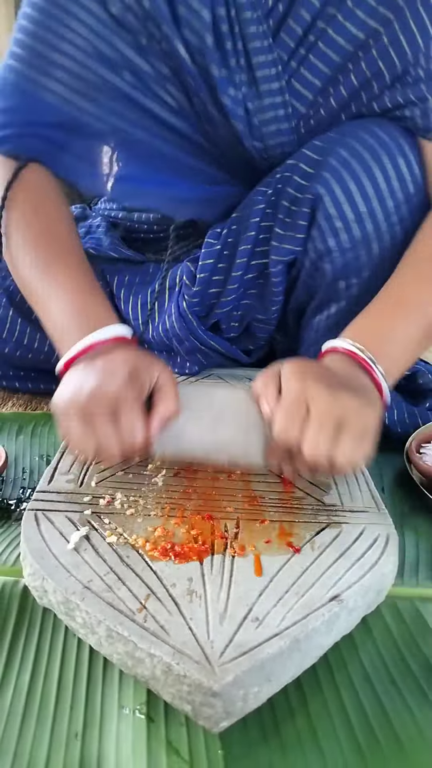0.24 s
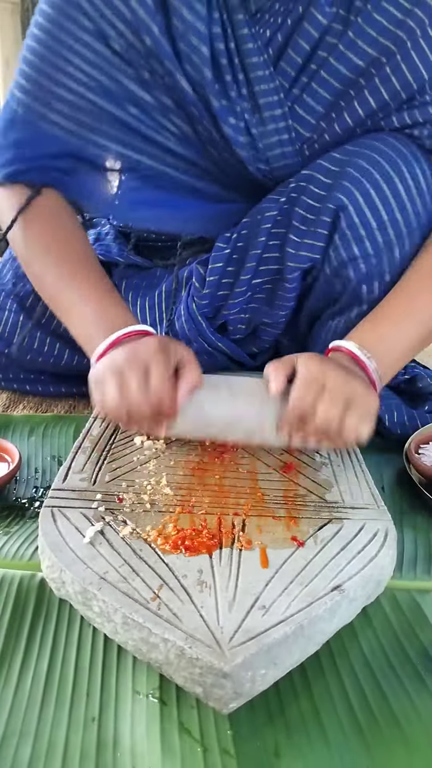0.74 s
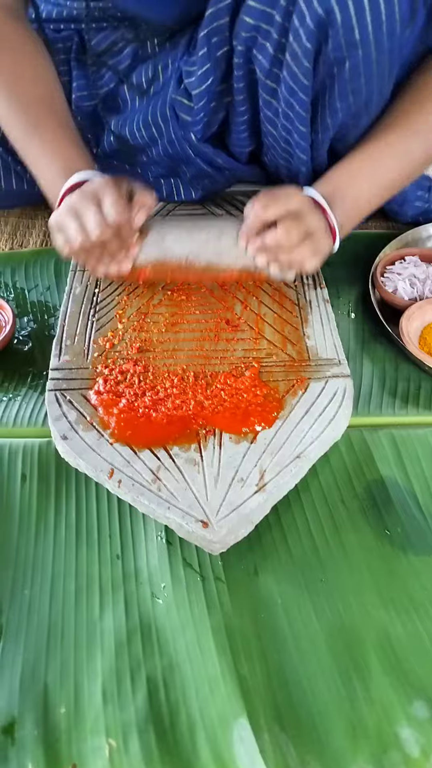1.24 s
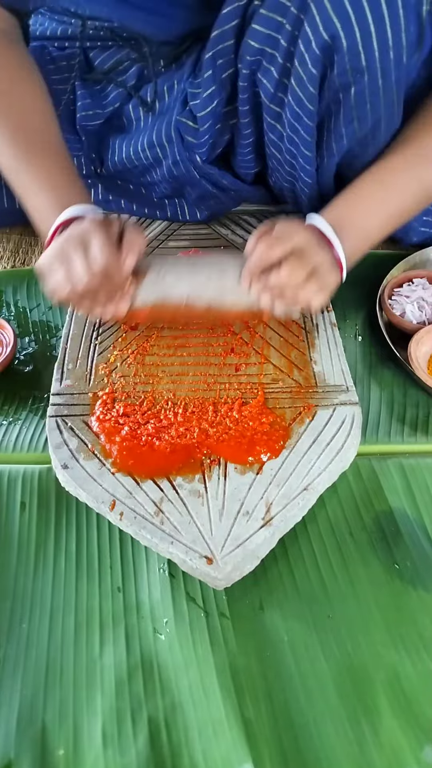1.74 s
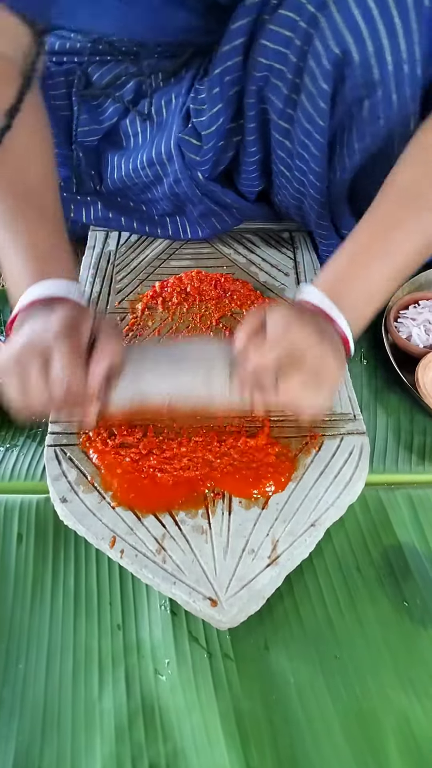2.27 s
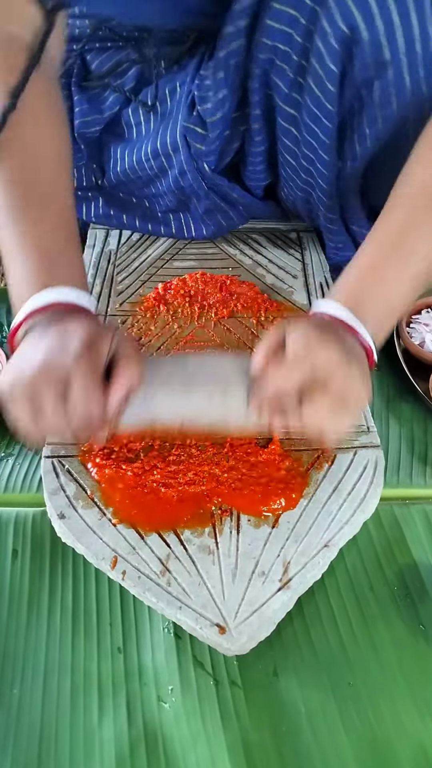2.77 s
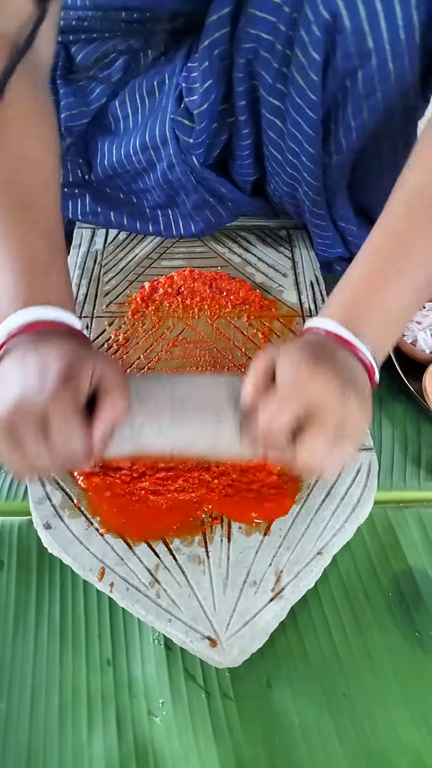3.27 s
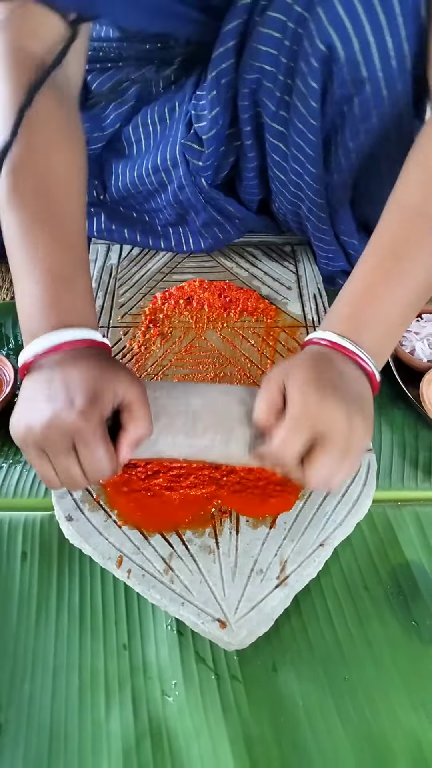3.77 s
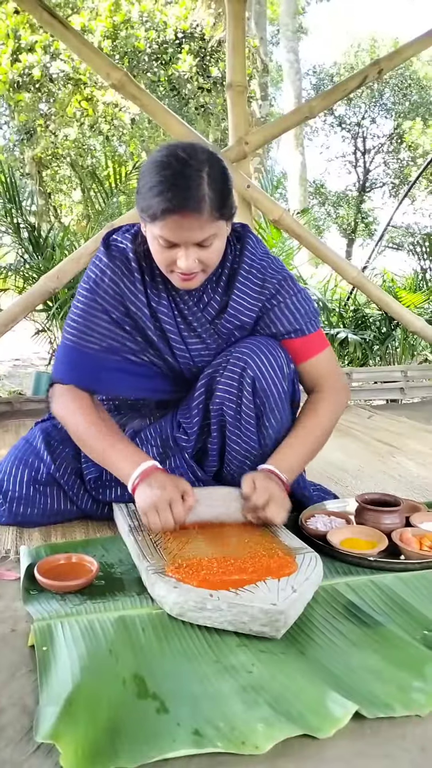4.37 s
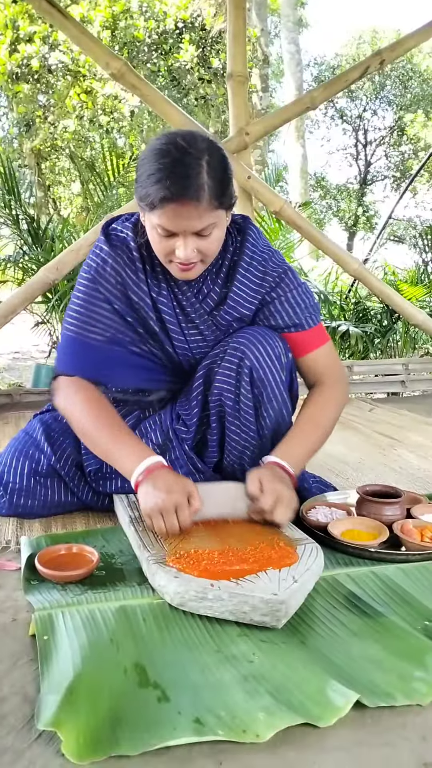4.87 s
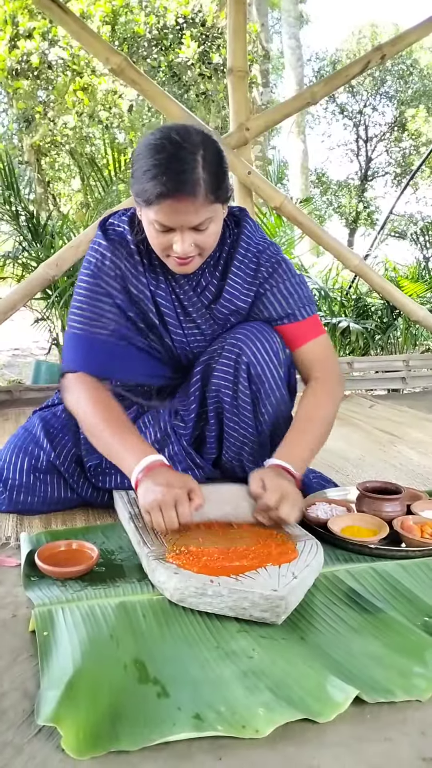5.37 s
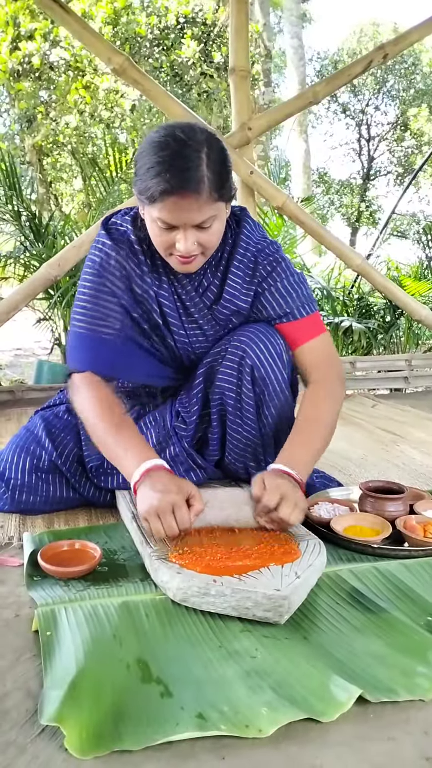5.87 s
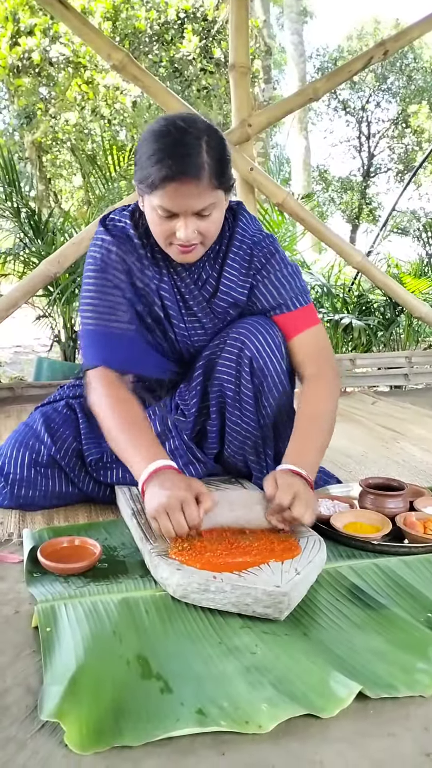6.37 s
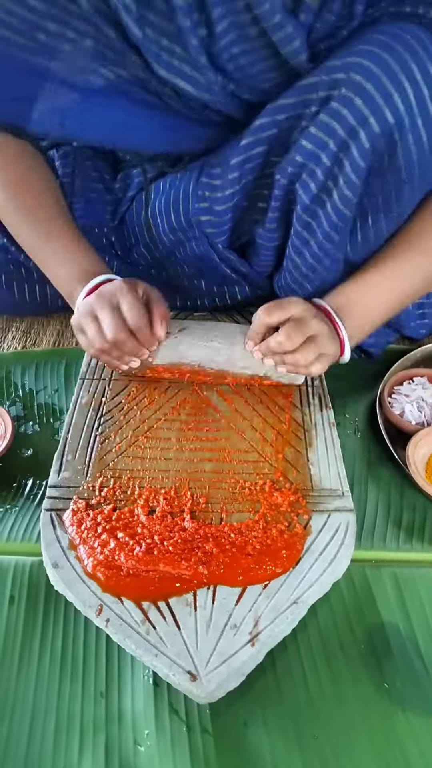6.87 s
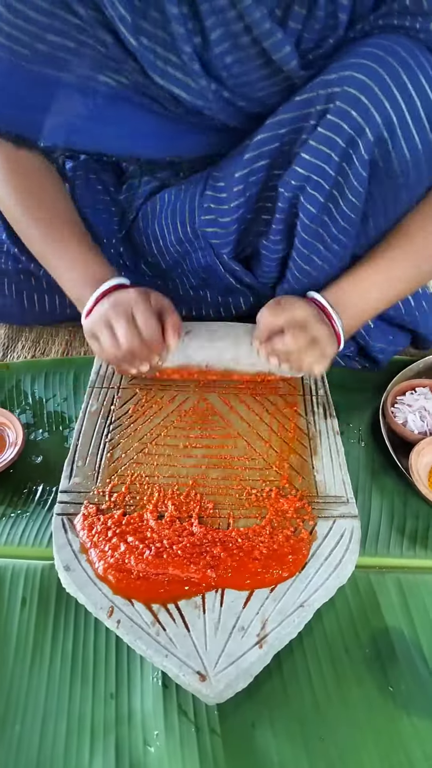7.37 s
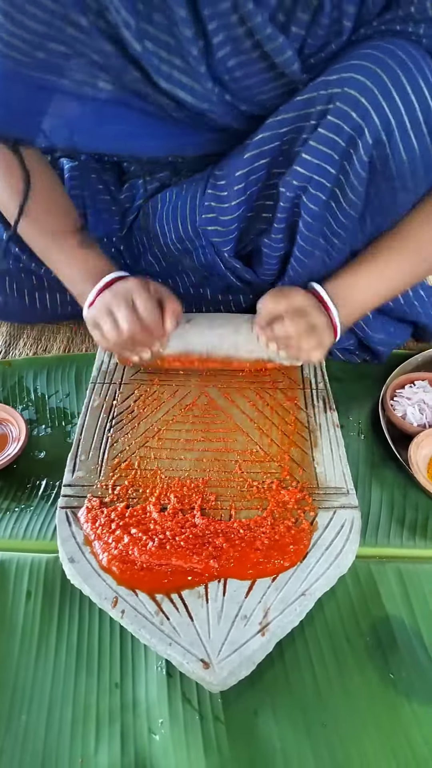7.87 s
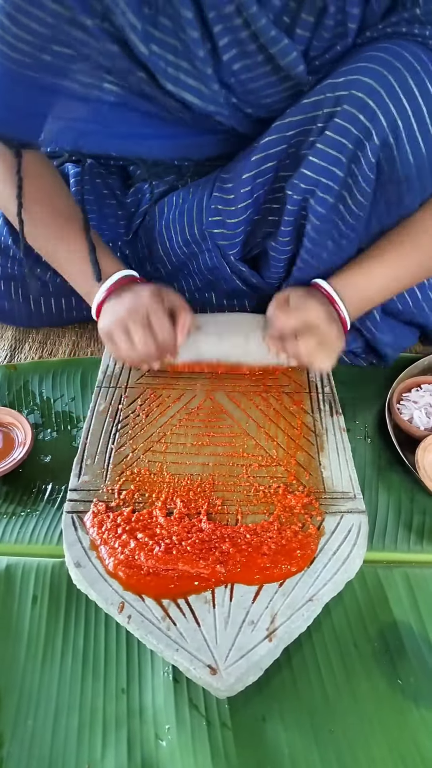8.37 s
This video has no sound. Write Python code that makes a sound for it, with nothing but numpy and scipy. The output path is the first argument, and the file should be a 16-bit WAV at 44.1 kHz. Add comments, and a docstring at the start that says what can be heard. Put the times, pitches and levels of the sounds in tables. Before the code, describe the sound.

Outdoors in an open shelter, a stone roller grinds moist spice on a grooved slab, going there and back about twice a second. From 0 to 1.1 s it is close and gritty: crackling spice, fizzing paste, rasps and crowded hollow knocks. Until 4 s the strokes are smoother, swelling and sinking with a wavering mid-pitched stone note, hoarse push squeaks and faint thin squeaks near 1.6 and 2 s. Wind buffets the microphone, thumping around 0.7-1 s and hardest at 3.3-3.7 s. From 4 to 6.7 s the microphone is a few steps away: softer grinding, less fizz, calm air, a cluster of clacks near 5.5 s. After a tiny dropout at 6.7 s it is close again, the stone note and ringing knocks growing stronger around 7.9 and 8.4 s, with light low air and a last rasp starting as it ends at 8.6 s.

```python
"""Outdoors at an open bamboo shelter, a stone roller grinds wet spice on a grooved stone slab.
It goes there and back about twice a second; each stroke swells and sinks as shaped noise and a wavering stone note.
Pushes add a hoarse squeak; drops into grooves ring as dying sines with a crack of filtered noise.
Spice and paste crackle, fizz, smack and tick as bursts of fine noise, and the slab rumbles under the roller.
Low noise and dying low tones buffet the microphone, which stands further off for a while in the middle."""
import sys
import numpy as np
from scipy import signal
from scipy.fft import rfft, irfft, next_fast_len
from scipy.io import wavfile
from scipy.ndimage import uniform_filter1d, map_coordinates

SR = 44100
rng = np.random.default_rng(int(sys.argv[2]) if len(sys.argv) > 2 else 0)


def generate_wav(signal):
    """Clip the signal to [-1, 1] and save it as 16-bit WAV at the path in sys.argv[1]."""
    frames = np.transpose(np.atleast_2d(signal))
    scaled = np.clip(frames, -1, 1) * 32767
    pcm = np.round(scaled).astype(np.int16)
    wavfile.write(sys.argv[1], SR, pcm)


N = 380583

# All levels in the tables are relative: the functions add their own offsets.
# strokes, drawn back and pushed in turn:
# (start [s], rise [s], fall [s], hum [dB], rasp [dB], grit [dB], paste fizz [dB])
STROKES = [(0.0, 0.0077, 0.049, -26, -33, -31, -38.5), (0.034, 0.11, 0.1, -29, -36, -32.5, -35.5),
           (0.289, 0.108, 0.15, -28.5, -36.0, -40, -40), (0.493, 0.077, 0.11, -29.5, -33.5, -31, -36.0),
           (0.719, 0.14, 0.12, -28.0, -34.5, -43.5, -44), (0.973, 0.066, 0.094, -31, -25.5, -34.0, -37),
           (1.181, 0.069, 0.12, -19, -36, -49, -48.5), (1.38, 0.079, 0.14, -28, -31.5, -44, -48.5),
           (1.635, 0.039, 0.2, -23.5, -34.5, -48.5, -53.0), (1.857, 0.055, 0.16, -27.5, -31.0, -44, -48.5),
           (2.099, 0.064, 0.14, -24.5, -32.5, -47, -53.5), (2.315, 0.057, 0.16, -27, -31.0, -41, -49.5),
           (2.561, 0.092, 0.1, -16.5, -29, -42.5, -49.5), (2.754, 0.13, 0.12, -28, -33.5, -43, -49),
           (3.044, 0.065, 0.12, -19.5, -30.5, -43.5, -52), (3.219, 0.16, 0.085, -21.5, -29.5, -40, -48),
           (3.501, 0.08, 0.17, -13.5, -30.5, -45, -50), (3.728, 0.13, 0.099, -23.5, -31, -41, -46),
           (3.957, 0.03, 0.096, -34, -39, -48, -52.5), (4.094, 0.11, 0.12, -29.5, -37.5, -46.5, -47),
           (4.395, 0.052, 0.21, -25, -42.5, -52.5, -52.5), (4.615, 0.12, 0.12, -29.5, -35.5, -45.5, -40.5),
           (4.911, 0.075, 0.19, -22, -36, -50.5, -54), (5.15, 0.123, 0.15, -32.5, -36.0, -47, -49),
           (5.441, 0.053, 0.18, -15.5, -27.5, -48.5, -58), (5.679, 0.11, 0.13, -30.0, -34.0, -44, -41),
           (5.965, 0.117, 0.12, -23.5, -40.5, -54.5, -52), (6.157, 0.18, 0.095, -34.5, -37, -45, -53),
           (6.48, 0.067, 0.26, -29.5, -45.5, -55.5, -54), (6.621, 0.065, 0.072, -26, -35.5, -48.5, -48.5),
           (6.801, 0.11, 0.13, -19, -34, -49, -54.0), (7.067, 0.089, 0.15, -29.5, -34.5, -45.5, -52.5),
           (7.305, 0.15, 0.091, -18, -30.5, -44, -63), (7.58, 0.05, 0.23, -27.5, -32, -44.5, -49.5),
           (7.824, 0.099, 0.14, -10, -29.0, -47, -68.5), (8.085, 0.057, 0.2, -18.5, -31, -44, -48.5),
           (8.322, 0.098, 0.18, -17.5, -32.5, -46, -67), (8.593, 0.088, 0.18, -21.5, -17, -40, -40)]
# how hum, rasp, grit and fizz follow a stroke, one row each:
# (level at rest [dB], change of that from further off [dB], power of the stroke's arch [no unit])
STROKE_RESPONSE = [(-64.5, -2.5, 0.6), (-55, -4, 0.7), (-56.5, -7.5, 0.75), (-58.5, -15.5, 0.36)]
# where the microphone stands:
# (time [s], distance [0 close to 1 a few steps away], lead of the left side [ms])
DISTANCE = [(0, 0, -.02), (1.1, 0, -.02), (1.15, 0, .06), (4.0, 0, .06), (4.02, 1, -.11), (6.68, 1, -.11),
            (6.69, 0, 0), (8.63, 0, 0)]
# strength of the air on the microphone: (time [s], level [dB])
BUFFET = [(0.0, -39), (0.13, -25), (0.3, -37.5), (0.42, -17), (0.67, -23.5), (0.73, -13.5), (1.03, -22),
          (1.24, -42), (1.34, -25), (1.75, -36), (1.88, -22.5), (2.55, -25.5), (3.1, -35.5), (3.38, -24.5),
          (3.88, -16), (4.0, -24.5), (4.07, -60), (6.4, -52.5), (7.14, -43.5), (7.3, -44), (7.88, -34),
          (8.63, -40)]
# single puffs that thump the microphone: (time [s], level [dB], pitch [Hz])
PUFFS = [(.722, -10, 69), (.995, -8, 60.3), (3.268, -13.5, 48), (3.372, -3.5, 100), (3.446, -10, 99),
         (3.686, -1.5, 58.4), (7.11, -21, 69.5)]
# the roller drops into a deep groove: (time [s], ring level [dB], crack level [dB])
KNOCKS = [(0.016, -16, -22.5), (0.129, -8, -13.5), (0.198, -15, -20), (0.356, -21, -27), (0.402, -13, -28),
          (0.458, -17, -28.5), (0.585, -7, -15.5), (0.841, -11.5, -24), (0.859, -8, -33),
          (0.915, -20, -29.5), (1.031, -11.5, -21.5), (1.064, -14, -29), (1.238, -8.5, -23),
          (1.67, -13, -23.5), (1.744, -13.5, -35), (1.893, -16.5, -26), (2.176, -14, -38),
          (2.212, -8, -25.5), (2.619, -15, -38), (2.649, -8.5, -27), (2.673, -9, -29.5),
          (3.085, -11.5, -25.5), (3.122, -8, -25.5), (3.134, -1, -17.5), (3.147, -4, -23),
          (3.559, -14, -22), (3.592, -7, -30), (3.604, -5.5, -23), (3.776, -16.5, -27), (3.978, -20, -36),
          (4.033, -16, -34.5), (4.419, -18, -23.5), (4.464, -15.5, -34), (5.035, -16, -30),
          (5.089, -9.5, -19.5), (5.101, -13.5, -22), (5.454, -27, -17), (5.465, -16.5, -20),
          (5.481, -12.5, -14), (5.516, -5, -15), (5.574, -11, -24.5), (5.609, -8.5, -18), (5.618, -11, -10),
          (5.751, -18, -27.5), (6.082, -12, -30.5), (6.645, -13.5, -24.5), (7.219, -14, -32),
          (7.346, -18, -30.5), (7.404, -11.5, -26), (7.416, -5, -25.5), (7.443, -7, -20.5),
          (7.494, -9, -24.5), (7.505, -6.5, -18.5), (7.639, -15, -22), (7.914, -3, -13), (7.936, -4, -29),
          (7.953, -4.5, -22.5), (7.988, -4, -21.5), (8.138, -9.5, -20), (8.164, -6, -13),
          (8.357, -9.5, -19.5), (8.398, -8.5, -24), (8.414, -2, -10.5), (8.427, -6, -28.5),
          (8.501, -8, -30.5), (8.512, -3.5, -15.5), (8.523, -6, -14.5)]
# husks split and blobs of paste pop: (time [s], level [dB])
SMACKS = [(0.0202, -13.5), (0.2673, -16), (0.2773, -24.5), (0.3247, -28), (0.4725, -20), (0.564, -13),
          (0.6835, -21), (0.917, -11.5), (1.8264, -27), (2.288, -25.5), (2.524, -27), (2.996, -24.5),
          (3.2312, -24.5), (4.081, -29.5), (4.1121, -27.5), (4.362, -31.5), (4.6215, -28.5), (4.6543, -27),
          (5.101, -26), (5.146, -28), (5.172, -29.5), (5.372, -37), (5.618, -25.5), (6.4162, -31),
          (6.752, -25.5), (6.775, -28), (6.819, -17.5), (6.8296, -20), (7.154, -31.5), (7.286, -30),
          (7.503, -27.5), (7.799, -26.5), (7.899, -35), (8.0695, -19.5), (8.356, -21)]
# the roller is knocked off the slab and rings freely: (time [s], level [dB])
LIFTS = [(0.131, -6), (0.198, -13)]
# the slab rocks under the roller: (time [s], level [dB])
BUMPS = [(0.134, -31), (0.193, -24), (0.353, -20), (0.382, -19.5), (0.559, -23.5), (1.552, -24),
         (2.463, -34), (2.962, -27.5), (4.306, -35.5), (4.816, -33), (5.352, -26), (5.369, -33.5)]
# faint thin squeaks between strokes:
# (time [s], length [s], pitch at the start [Hz], pitch at the end [Hz], level [dB])
SQUEAKS = [(1.562, 0.1, 1610, 1380, -51), (2.01, 0.052, 1620, 1400, -47)]
# colour of the crack as stone hits stone: (frequency [Hz], level [dB])
CRACK_COLOUR = [(150, -29), (400, -21.5), (580, -18), (820, 0.5), (1100, 11.5), (1400, 4), (1750, 0.5),
                (2080, 8), (2400, -12.5), (3000, -21), (4500, -38), (8000, -69.5)]
# colour of crushed grit: (frequency [Hz], level [dB])
GRIT_COLOUR = [(1500, -18.5), (2400, 2.5), (2700, 5), (3050, -0.5), (3420, 4), (3950, -1), (4400, 3),
               (5200, 0.5), (6500, -7), (9000, -13.5)]
# colour of fizzing paste: (frequency [Hz], level [dB])
FIZZ_COLOUR = [(4500, -15.5), (6800, 0.5), (8700, -6), (10500, 1.5), (12600, 3), (13600, 2), (14600, -2.5),
               (15500, -1)]
# colour of the rumbling slab: (frequency [Hz], level [dB])
SLAB_COLOUR = [(150, -31.5), (280, -14), (440, -0.5), (510, -3), (570, -6), (680, -5.5), (1000, -43)]
# colour of the gusts: (frequency [Hz], level [dB])
GUST_COLOUR = [(12, -31), (20, -12.5), (54, 2), (113, 0), (217, -11), (329, -20), (450, -29), (580, -31.5),
               (990, -120)]
# colour of the steady outdoor hush: (frequency [Hz], level [dB])
HUSH_COLOUR = [(25, -12), (60, 5), (110, 6.5), (200, -5.5), (320, -7.5), (850, -32), (1500, -18.5),
               (4500, -25.5), (6500, -31.5), (15000, -41)]
# colour of the rasp with the roller near the body: (frequency [Hz], level [dB])
RASP_NEAR_COLOUR = [(300, -47), (560, -29), (780, 14.5), (930, -3), (1100, 4), (1350, -10), (1620, -8.5),
                    (2020, -2.5), (2300, -5.5), (3000, -46), (5000, -62.5)]
# colour of the rasp with the roller at the far end: (frequency [Hz], level [dB])
RASP_FAR_COLOUR = [(250, -21.5), (450, 0), (600, -4), (770, 1.5), (860, 3), (1050, -2.5), (1500, -10),
                   (1850, -11.5), (2070, 0.5), (2300, -24), (3000, -44), (5000, -57.5)]
# how alike left and right are: (frequency [Hz], likeness [0 to 1])
ALIKE = [(100, 1), (400, 0.89), (820, 0.54), (1400, 0.48), (2400, 0.33), (4000, 0.044), (15000, 0.084)]
# how fast the surroundings fall silent: (frequency [Hz], time to fall 60 dB [s])
SHELTER_DECAY = [(200, 0.084), (1000, 0.05), (10000, 0.025)]
STONE_HZ, ROLLER_HZ = 828.8, 1090  # base note of the stones; note of the free roller
JUDDER_NEAR_HZ, JUDDER_FAR_HZ = 1093, 842  # centre of the push squeak near the body and at the far end
TURN_SMACK_DB, TURN_SCATTER_DB = -38.5, -3  # paste lets go at each stroke's end: base level, random spread
TOP_HZ = 15650  # nothing is heard from here up


def amp(db):
    """Turn decibels into a gain."""
    return 10 ** (np.asarray(db) / 20)


def unit(x):
    """Scale a sound to an average strength (rms) of 1."""
    return x / np.sqrt(np.mean(x ** 2) + 1e-20)


def along(points, hz):
    """Read a curve of (Hz, value) points on a logarithmic frequency axis."""
    f, v = np.transpose(points)
    return np.interp(np.log(hz + 1), np.log(f + 1), v)


def curves(rows):
    """Give one value per sample for each column after the time."""
    s, *cols = np.transpose(rows)
    return [np.interp(np.arange(N) / SR, s, c) for c in cols]


def wobble(rate):
    """Draw a smooth random curve with rate random points a second."""
    points = rng.standard_normal(int(N * rate / SR) + 4)
    return map_coordinates(points, [np.arange(N) * rate / SR])


def filtered(x, response):
    """Multiply the spectrum of x by a response that depends on frequency."""
    m = next_fast_len(N + SR // 2)
    return irfft(rfft(x, m) * response(np.fft.rfftfreq(m, 1 / SR)), m)[..., :N]


def struck(x, spectrum, size=2048):
    """Colour x without sounding early; the answer to a single impulse peaks at 1."""
    cepstrum = irfft(np.log(amp(along(spectrum, np.fft.rfftfreq(size, 1 / SR)))))
    # folding the cepstrum forward puts the whole response after the blow (minimum phase)
    cepstrum[1:size // 2] *= 2
    cepstrum[size // 2 + 1:] = 0
    pulse = irfft(np.exp(rfft(cepstrum)))
    return signal.fftconvolve(x, pulse[None] / np.abs(pulse).max(), axes=1)[:, :N]


def stereo(pair, spectrum):
    """Colour two unrelated signals and blend them into left and right, rms 1."""
    def response(hz):
        turn = np.arccos(np.clip(along(ALIKE, hz), -1, 1)) / 2
        return amp(along(spectrum, hz)) * [np.cos(turn), np.sin(turn)]

    mid, side = filtered(pair, response)
    return unit(np.array([mid + side, mid - side]))


def grains(rate, spread_db, bed_db):
    """Tiny fractures of uneven size, rate a second on average, on a bed of smooth rubbing noise."""
    happens = rng.random(N) < rate / SR
    sizes = happens * amp(spread_db * np.minimum(rng.exponential(size=N), 4))
    fractures = unit(sizes * rng.standard_normal((2, N)))
    return fractures + amp(bed_db) * rng.standard_normal((2, N))


def add(track, s, sound):
    """Lay a sound into a track at time s."""
    part = track[..., max(round(s * SR), 0):][..., :sound.shape[-1]]
    part += sound[..., :part.shape[-1]]


def delayed(x, ms):
    """Hear x later by a delay that may change."""
    return map_coordinates(x, [np.arange(N) - ms * SR / 1000])


def pings(rows, t60, attack):
    """Lay down one dying sine for each (s, dB, Hz); t60 is its time to fall 60 dB [s]."""
    track, t = np.zeros(N), np.arange(SR // 4) / SR
    for s, db, hz in rows:
        envelope = amp(db - 60 * t / t60) * (1 - np.exp(-t / attack))
        add(track, s, envelope * np.sin(2 * np.pi * hz * t))
    return track


def travel():
    """Place of the roller, 0 near the body to 1 far, and speed, 0 to 1; it turns as each stroke starts."""
    start, rise, fall, *_ = STROKES[-1]
    turns = [row[0] for row in STROKES] + [start + rise + fall]
    angle = np.pi * np.interp(np.arange(N) / SR, turns, np.arange(len(turns)))
    return .5 + .5 * np.cos(angle), np.abs(np.sin(angle))


def stroke_levels(far):
    """Hum, rasp, grit and fizz in dB: each swells from rest to the stroke's peak and sinks back."""
    t = np.arange(N) / SR
    rest = np.array([db + far_db * far for db, far_db, _ in STROKE_RESPONSE])
    power = np.abs([[row[2]] for row in STROKE_RESPONSE])
    swell = np.zeros_like(rest)
    for start, rise, fall, *peaks in STROKES:
        end = start + rise + fall
        span = slice(*np.searchsorted(t, [start, end]))
        progress = np.interp(t[span], [start, start + rise, end], [0, .5, 1])
        arch = np.abs(np.sin(np.pi * progress))
        climb = (np.array(peaks)[:, None] - rest[:, span]) * arch ** power
        swell[:, span] = np.maximum(swell[:, span], climb)
    return rest + swell


def airborne():
    """Near 1 while the roller hops around a knock, 0 while it bears on the slab."""
    lift, t = np.zeros(N), np.arange(SR // 30) / SR
    for row in KNOCKS:
        add(lift, row[0] - .013, np.abs(np.sin(np.pi * t / t[-1])) ** .5)
    return np.minimum(lift, 1)


def air():
    """Lumps of moving air, unrelated left and right, and shared puffs, over the steady outdoor hush."""
    buffet_db, = curves(BUFFET)
    lumps = amp(8.2 * np.tanh([wobble(35), wobble(35)]))
    swirl = filtered(rng.standard_normal((2, N)), lambda hz: amp(along(GUST_COLOUR, hz)))
    puffs = amp(0.5) * pings(PUFFS, t60=0.07, attack=0.0029)
    gusts = amp(buffet_db) * unit(lumps * swirl) + puffs
    hush = amp(-46.5) * stereo(rng.standard_normal((2, N)), HUSH_COLOUR)
    return gusts * amp([[-1.6], [1.6]]) + hush


def rolling(note_hz, hum_db, rasp_db, wander_hz, flutter_db):
    """Small bumps keep the stone note going, unsteady in pitch and strength; sliding smothers it."""
    hz = note_hz + wander_hz * wobble(130)
    flutter = amp(flutter_db * np.minimum(wobble(85), 1.3))
    note = unit(np.sin(2 * np.pi * np.cumsum(hz) / SR) * flutter)
    # the stronger the rasp beside the hum, the less of the note comes through
    clear = np.sqrt(np.clip(1 - amp(rasp_db - hum_db - 3.5) ** 2, .08, 1))
    return amp(hum_db) * clear * note


def rasping(rasp_db, place, speed):
    """Coarse grains catch between the stones, hardest in mid push; the colour sinks along the slab."""
    catches = grains(rate=1000, spread_db=2.5, bed_db=-4.5)
    near = (1 - place) * stereo(catches, RASP_NEAR_COLOUR)
    colour = near + place * stereo(catches, RASP_FAR_COLOUR)
    pushing = speed * (np.gradient(place) > 0)
    return amp(rasp_db + 1.64 * pushing + 1.65 * wobble(110)) * colour


def crushing(grit_db, fizz_db, place, speed):
    """Spice crackles and paste fizzes; the echo off the hands shifts its colour as the roller travels."""
    jerks = wobble(60)
    grit_noise = stereo(grains(rate=4200, spread_db=4.0, bed_db=2.0), GRIT_COLOUR)
    grit = amp(grit_db + 2.1 * jerks) * grit_noise
    fizz_level = amp(fizz_db + 0.84 * speed + jerks + 2.0 * wobble(90))
    fizz = fizz_level * stereo(grains(rate=3000, spread_db=-4.5, bed_db=1.0), FIZZ_COLOUR)
    direct = grit * amp([[-.8], [.8]]) + fizz * amp([[-1.2], [1.2]])
    echo = np.array([delayed(side, 0.41 + .5 * place) for side in direct])
    return direct + 0.12 * echo


def ticks(fizz_db, rate, level_db, spread_db, t60):
    """Now and then a single seed or bubble in the paste ticks: a short dying burst of noise."""
    happens = rng.random(N) < rate / SR
    pops = happens * amp(spread_db * np.clip(rng.standard_normal(N), -2, 2))
    bursts = signal.fftconvolve(pops, amp(-60 * np.arange(SR // 20) / SR / t60))[:N]
    return amp(fizz_db + level_db) * bursts * stereo(rng.standard_normal((2, N)), FIZZ_COLOUR)


def slab(stone, grit_db, far, jolt_db, bump_t60):
    """The slab rumbles with the stones' force, louder from further off; spice jolts it and it rocks."""
    strength = np.sqrt(np.abs(uniform_filter1d(stone ** 2, size=500)))
    force = strength * amp(-22.5 + 9.3 * far) + amp(grit_db + jolt_db)
    t = np.arange(SR // 8) / SR
    for s, db in BUMPS:
        add(force, s, amp(db) * (1 - np.exp(-t / 0.0014)) * amp(-60 * t / bump_t60))
    return force * stereo(rng.standard_normal((2, N)), SLAB_COLOUR)


def knocks(note_hz, t60, attack, crack_t60, sag, ring_db, crack_db, crunch_db):
    """Each drop rings the stone and stops the ring before it; hard drops start faster and die sooner."""
    rings, blows, t = np.zeros(N), np.zeros((2, N)), np.arange(SR // 8) / SR
    gaps = np.diff([row[0] for row in KNOCKS], append=N / SR + 1)
    for (s, db, hit_db), gap, contact in zip(KNOCKS, gaps, rng.standard_normal(len(KNOCKS))):
        # a crack that is strong beside its ring means a hard drop
        softness = np.clip((db - hit_db) / 14, .3, 1.6)
        swell = (1 - np.exp(-t / (attack * softness))) * amp(-60 * t / (t60 * np.sqrt(softness)))
        stop = np.clip((gap - t) / 0.0036, 0, 1)
        # the note depends on where the stones touch, and sags as the swing dies
        hz = note_hz[round(s * SR)] * (1 + 0.027 * contact + sag * np.exp(-t / 0.087))
        tone = np.sin(2 * np.pi * np.cumsum(hz) / SR)
        add(rings, s, amp(db + ring_db) * swell / swell.max() * stop * tone)
        # the contact chatters on briefly after the first impulse
        shared = rng.standard_normal(len(t))
        chatter = 0.1 * (shared + 0.98 * rng.standard_normal((2, len(t)))) * amp(-60 * t / crack_t60)
        chatter[:, 0] += 1
        add(blows, s, amp(hit_db + crack_db) * chatter)
    # grit caught under the blow crunches
    return rings + struck(blows, CRACK_COLOUR) + amp(crunch_db) * struck(blows, GRIT_COLOUR)


def smacks(t60, attack, level_db, snap_db):
    """Sticky paste lets go and husks split: short bursts of fine crackle."""
    bursts, t = np.zeros(N), np.arange(SR // 12) / SR
    lucks = rng.standard_normal(len(STROKES))
    turns = [(start + rise + fall, TURN_SMACK_DB + TURN_SCATTER_DB * luck)
             for (start, rise, fall, *_), luck in zip(STROKES, lucks)]
    for s, db in list(SMACKS) + turns:
        add(bursts, s, amp(db + level_db - 60 * t / t60) * (1 - np.exp(-t / attack)))
    crackle = grains(rate=2600, spread_db=8.5, bed_db=8)
    colour = stereo(crackle, FIZZ_COLOUR) + amp(snap_db) * stereo(crackle, GRIT_COLOUR)
    return bursts * colour * amp([[-1], [1]])


def juddering(rasp_db, place, level_db, fade_db, wander_hz, flutter_db):
    """Pushed, the roller sticks and slips in a hoarse squeak that sinks and fades as the arms stretch."""
    centre_hz = JUDDER_NEAR_HZ + (JUDDER_FAR_HZ - JUDDER_NEAR_HZ) * place
    hz = centre_hz + wander_hz * wobble(330)
    note = unit(np.sin(2 * np.pi * np.cumsum(hz) / SR) * amp(flutter_db * wobble(120)))
    pushing = uniform_filter1d(1.0 * (np.gradient(place) > 0), size=800)
    return pushing * amp(rasp_db + level_db - fade_db * place) * note


def free_roller():
    """Knocked off the slab, the roller rings freely: a dying sine at its own note."""
    return pings([(s, db, ROLLER_HZ) for s, db in LIFTS], t60=0.058, attack=0.0047)


def squeaks():
    """Thin sines swell and fade; each nearly holds its pitch, then droops."""
    track = np.zeros(N)
    for s, length, start_hz, end_hz, db in SQUEAKS:
        u = np.linspace(0, 1, round(length * SR))
        hz = start_hz + (end_hz - start_hz) * u ** 2
        add(track, s, amp(db) * np.sin(np.pi * u) * np.sin(2 * np.pi * np.cumsum(hz) / SR))
    return track


def shelter(x):
    """The short answer of the ground and the open bamboo shelter: a tail of dying noise."""
    hz, t, z = signal.stft(rng.standard_normal((2, SR // 3)), SR, nperseg=256)
    decay = amp(-60 * t / along(SHELTER_DECAY, hz)[:, None])
    tail = signal.istft(z * decay, SR, nperseg=256)[1]
    late = np.pad(x, ((0, 0), (300, 0)))  # the answer starts 300 samples late
    return signal.fftconvolve(late, tail / np.linalg.norm(tail[0]), axes=1)[:, :N]


def scene():
    """Mix the stones, the slab under them, the spice and the air."""
    far, lead_ms = curves(DISTANCE)
    hum_db, rasp_db, grit_db, fizz_db = stroke_levels(far)
    place, speed = travel()
    hop = airborne()
    note_hz = STONE_HZ + 20 * far

    stone = knocks(note_hz, t60=0.059, attack=0.0024, crack_t60=0.043, sag=0.0077,
                   ring_db=-0.5, crack_db=2.5, crunch_db=-16)
    stone = stone + free_roller()
    hum = rolling(note_hz, hum_db, rasp_db, wander_hz=35.83, flutter_db=6.5)
    hum = hum + juddering(rasp_db, place, level_db=-2.5, fade_db=1, wander_hz=95.9, flutter_db=5.5)
    # hum and rasp dip while the roller is off the slab
    stone = stone + amp(-9 * hop) * hum
    rasp = amp(-4 * hop) * rasping(rasp_db, place, speed)
    left, right = stone * amp([[.4], [-.4]]) + rasp * amp([[-1.2], [1.2]])
    stones = np.array([delayed(left, -lead_ms / 2), delayed(right, lead_ms / 2)])

    rumble = amp(-2.5) * slab(stone[0], grit_db, far, jolt_db=-9, bump_t60=0.069)
    spice = crushing(grit_db, fizz_db, place, speed)
    spice = spice + smacks(t60=0.034, attack=0.0012, level_db=-4.0, snap_db=-17.0)
    spice = spice + ticks(fizz_db, rate=11, level_db=8, spread_db=7.5, t60=0.016)
    work = stones + rumble + spice + squeaks()
    return work + shelter(work * amp(-13.5 + 4 * far)) + air()


def record(dry):
    """Round the peaks, let the sound drop out for a blink at 6.685 s, and cut the highest treble."""
    live = np.clip((np.abs(np.arange(N) / SR - 6.685) - .009) / .002, 0, 1)
    rounded = dry / (1 + np.abs(dry) ** 6) ** (1 / 6)
    return filtered(rounded * live, lambda hz: hz < TOP_HZ)


dry = scene()
out = record(dry)
generate_wav(out)
```